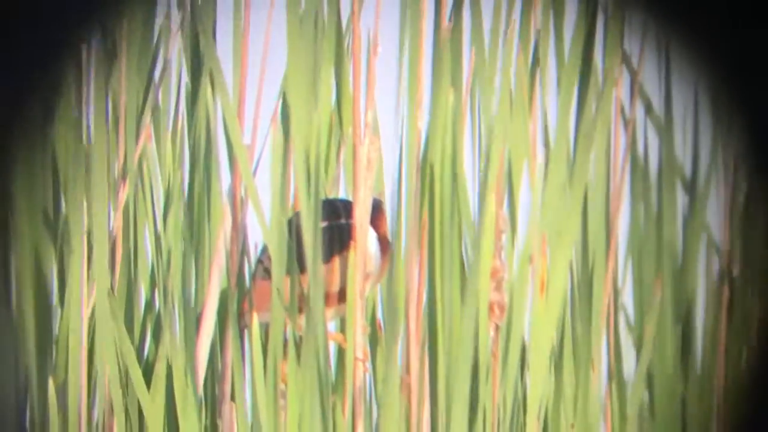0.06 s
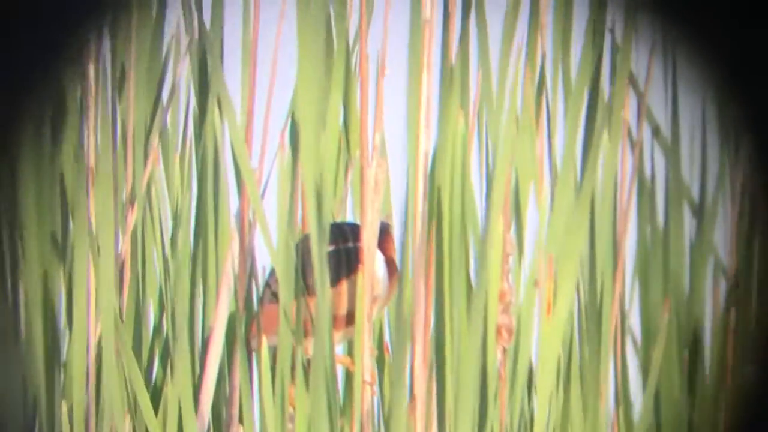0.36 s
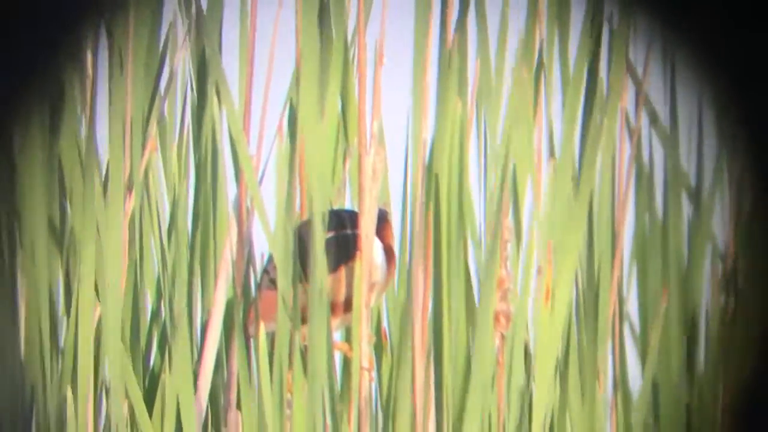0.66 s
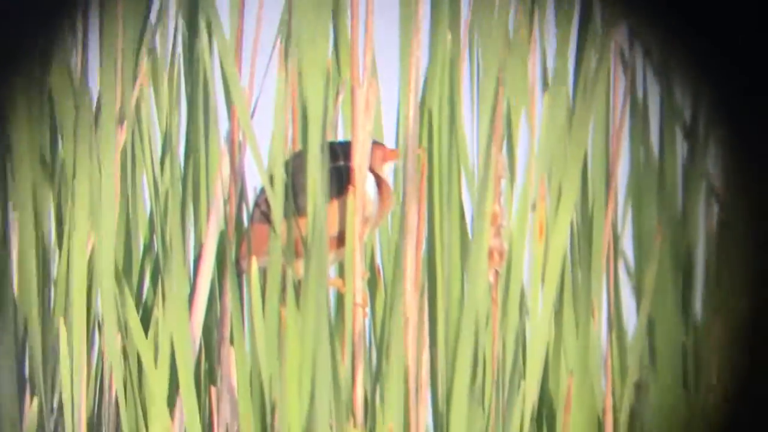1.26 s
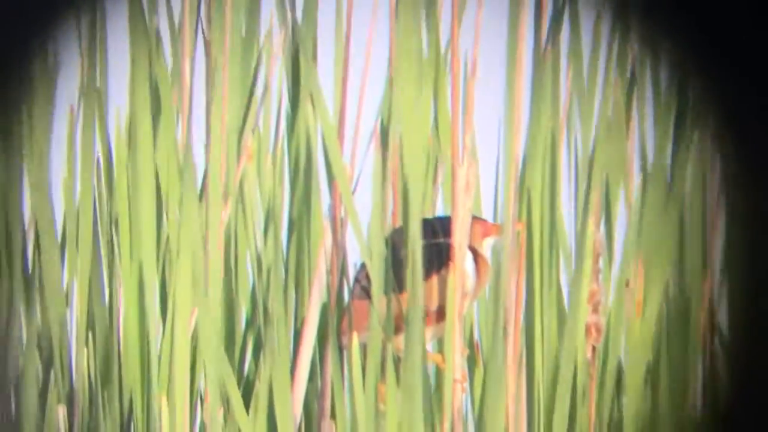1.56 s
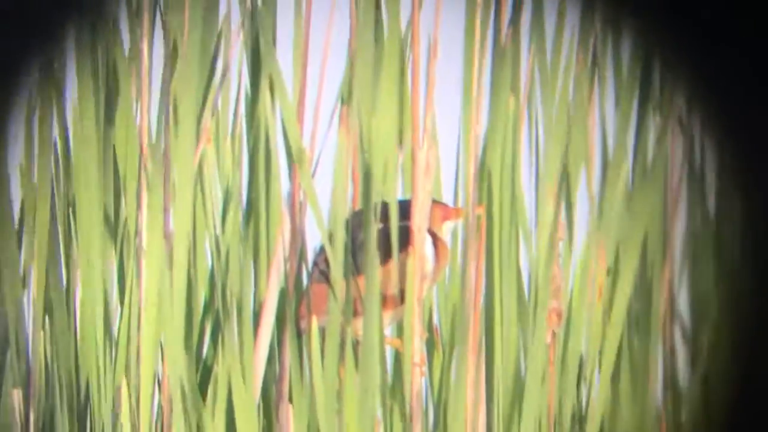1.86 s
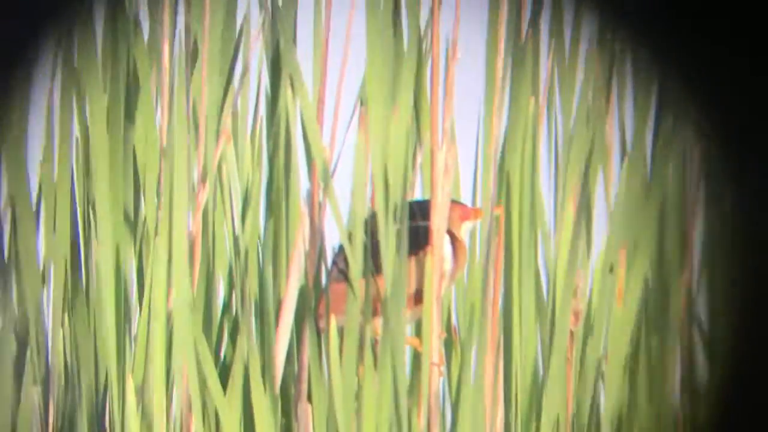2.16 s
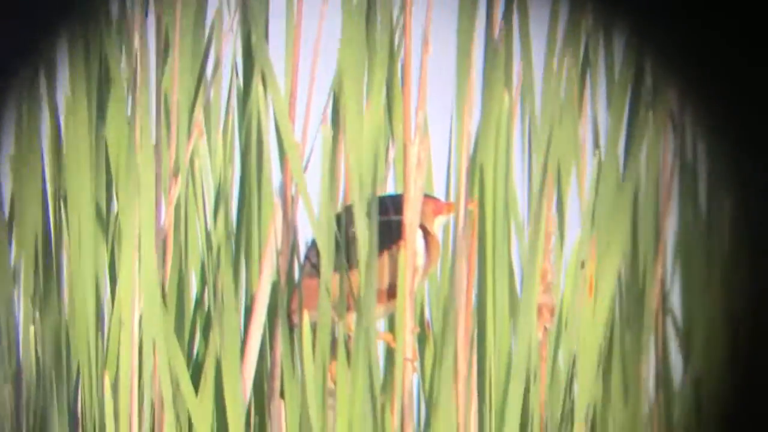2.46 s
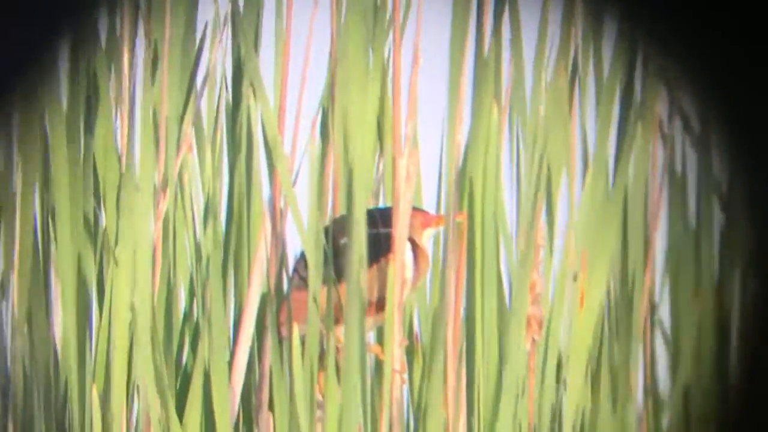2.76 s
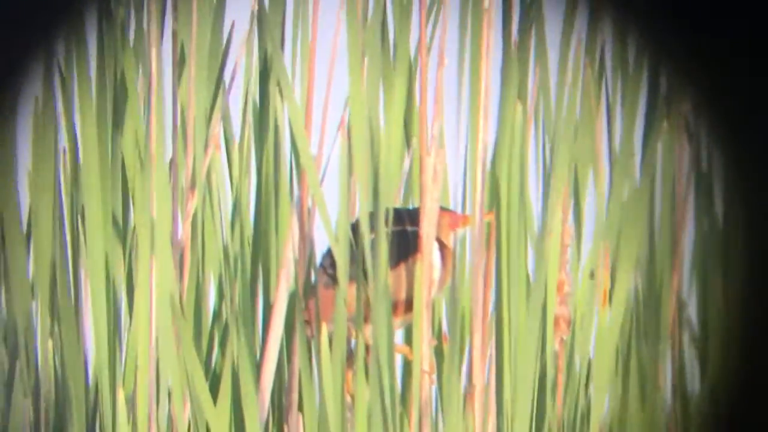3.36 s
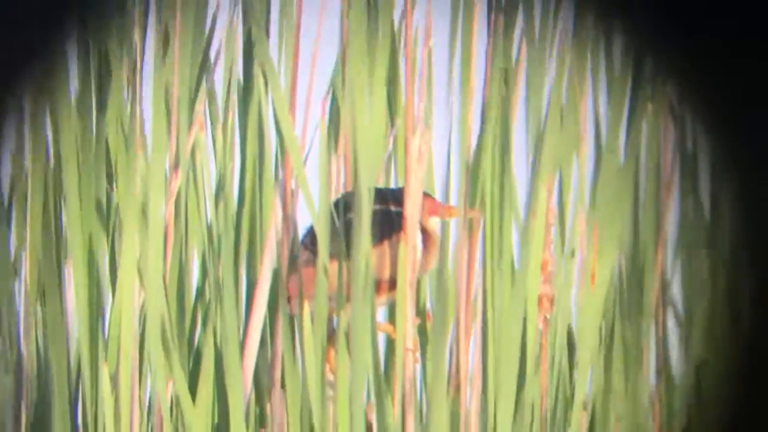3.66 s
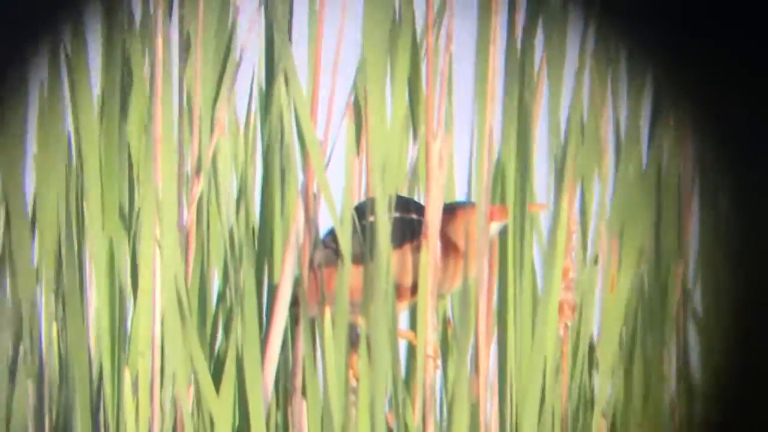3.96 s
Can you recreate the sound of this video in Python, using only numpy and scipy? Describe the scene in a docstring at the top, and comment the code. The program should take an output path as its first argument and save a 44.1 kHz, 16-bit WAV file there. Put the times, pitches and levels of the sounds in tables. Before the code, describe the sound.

A small bittern gives five short, hoarse coos in quick succession from about 0.9 to 1.5 seconds. Songbirds chirp and trill in the reeds from the start, with overlapping fast trills from 1.4 seconds and brighter slurred whistles from 2.4 until the end at 4. A far bird chorus, a low traffic-like rumble and faint hiss lie underneath, with one soft, dull bump near 2.4 seconds.

```python
"""Small bittern in a reed bed

A small bittern gives five short, hoarse coos: uneven pulses ringing one throat resonance.
Around it songbirds trill, chatter and whistle in quick, nearly pure slurs, scattered by the reeds,
over a far chorus. A low rumble, as of distant traffic, a faint hiss and one dull bump lie underneath."""
import sys
import numpy as np
from scipy import signal
from scipy.fft import rfft, irfft
from scipy.io import wavfile
from scipy.ndimage import uniform_filter1d

SR = 44100
rng = np.random.default_rng(int(sys.argv[2]) if len(sys.argv) > 2 else 0)


def store_wav(level_fs):
    """Save 16-bit WAV to argv[1]."""
    pcm = np.round(np.clip(np.atleast_2d(level_fs), -1, 1) * 32767)
    wavfile.write(sys.argv[1], SR, pcm.T.astype(np.int16))


N = 176400

RUMBLE_DB, HISS_DB = -49, -72
BUMP_S, BUMP_RISE_S, BUMP_DECAY_S, BUMP_DB = 2.395, .05, 0.054, -55.5
CHORUS_WASH_DB, FAR_CHIRP_DB = -3.5, -1.5  # relative to the chorus level
FAR_CHIRPS_PER_S, FAR_CENTRE_HZ, FAR_SPREAD_OCT = 45, 3697, .33
WAVER_HZ, SONG_ATTACK, SONG_RELEASE = 22.3, 0.27, 0.38
CHIP_SPREAD_DB, BUZZ_PER_S = 3.5, 330
WARBLE_PER_S, WARBLE_SWING_HZ, WARBLE_SAG_HZ_PER_S = 52, 294, 1300
THROAT_WIDTH_HZ, COO_BAND_HZ, COO_ATTACK, COO_RELEASE = 250, (685, 1520), 0.29, 0.33
COO_JITTER, COO_SHIMMER_DB, COO_RASP = 0.17, 12.5, 0.56  # at a hoarseness of 1
REEDS_T60_S, REEDS_ONSET_S, COO_ECHO_DB, SONG_ECHO_DB = 0.43, .012, -8.5, -11.5
CUTOFF_HZ = 15900


def from_db(db):
    """Decibels to gain."""
    return 10 ** (np.asarray(db) / 20)


def rms_one(x):
    """Scale to unit power."""
    return x / np.sqrt(np.mean(x ** 2) + 1e-20)


def add(out, start_s, x):
    """Mix a sound in at a time, trimmed to the scene."""
    i = int(start_s * SR)
    x, i = x[max(-i, 0):], max(i, 0)
    out[i:i + len(x)] += x[:max(N - i, 0)]


def span(length_s):
    """Progress 0-1 through a note."""
    return np.linspace(0, 1, max(int(length_s * SR), 16))


def swell(u, attack, release):
    """Smooth rise, hold and fall, in shares of the note."""
    rise = np.sin(np.pi / 2 * np.clip(u / attack, 0, 1)) ** 2
    fall = np.sin(np.pi / 2 * np.clip((1 - u) / release, 0, 1)) ** 2
    return rise * fall


def wander(n, rate_hz):
    """Random motion of spread about 1."""
    at = np.arange(n) * rate_hz / SR
    return np.interp(at, np.arange(4096), rng.standard_normal(4096))


def contour(u, shape):
    """Smooth path along a few points."""
    return uniform_filter1d(np.interp(u, *np.transpose(shape)), max(len(u) // 7, 1), mode="nearest")


def resonate(x, hz, width_hz):
    """One resonance of gain 1."""
    r = np.exp(-np.pi * width_hz / SR)
    poles = [1, -2 * r * np.cos(2 * np.pi * hz / SR), r * r]
    return signal.lfilter(np.array([1, 0, -1]) * (1 - r * r) / 2, poles, x)


def noise(spectrum, skirt_db=24):
    """Unit-power noise of a given colour, falling off by the octave beyond its ends."""
    hz, db = np.transpose(spectrum)
    octave, marks = np.log2(np.maximum(np.arange(N // 2 + 1) * SR / N, 1)), np.log2(hz)
    beyond = np.abs(octave - np.clip(octave, marks[0], marks[-1]))
    colour = from_db(np.interp(octave, marks, db) - skirt_db * beyond)
    return rms_one(irfft(rfft(rng.standard_normal(N)) * colour, N))


def whistle(hz, db):
    """One nearly pure bird note along a pitch path, wavering a little in pitch and level."""
    n = len(hz)
    phase = 2 * np.pi * np.cumsum(hz + WAVER_HZ * wander(n, 300)) / SR
    peak = np.sqrt(2) * from_db(db + 1.35 * wander(n, 150))
    return peak * swell(np.linspace(0, 1, n), SONG_ATTACK, SONG_RELEASE) * np.sin(phase)


def reeds(x):
    """Many weak reflections from the stems, dying away."""
    t = np.arange(SR) / SR
    tail = rng.standard_normal(SR) * from_db(-60 * t / REEDS_T60_S) * np.clip(t / REEDS_ONSET_S, 0, 1)
    return signal.fftconvolve(x, tail / np.linalg.norm(tail))[:N]


def rumble():
    """A low bed of noise with a few droning resonances, as of distant traffic."""
    # colour of the bed: (frequency [Hz], relative level [dB])
    spectrum = [(13, -50.5), (22, -23), (48, -2), (108, 1.5), (155, -5.5), (177, -10), (214, -8),
                (247, -15.5), (311, -20), (370, -24), (614, -37.5), (700, -34.5), (910, -55.5),
                (1540, -120)]
    # resonances: (frequency [Hz], width [Hz], level [dB])
    resonances = [(58.5, 8.5, -52.5), (103.9, 13.2, -52), (150, 9.2, -58), (209, 11.7, -60.5)]
    drones = sum(from_db(db) * rms_one(resonate(rng.standard_normal(N + SR), hz, width)[SR:])
                 for hz, width, db in resonances)
    drones = signal.sosfilt(signal.butter(4, 260, fs=SR, output="sos"), drones)
    return drones + from_db(RUMBLE_DB) * noise(spectrum)


def hiss():
    """Faint, steady broadband air."""
    # colour of the air: (frequency [Hz], relative level [dB])
    spectrum = [(300, 7.5), (600, 12.5), (1000, 8), (1800, 1), (5000, 4.5), (7500, -9), (9000, -3),
                (10300, -4.5), (11500, -1.5), (16000, -1)]
    return from_db(HISS_DB) * noise(spectrum)


def bump():
    """One soft, dull bump: low noise that swells and dies away."""
    # colour of the bump: (frequency [Hz], relative level [dB])
    spectrum = [(150, -20), (300, 8.5), (420, 0.5), (650, -9.5), (1000, -30), (2000, -52)]
    t = np.arange(N) / SR - BUMP_S
    envelope = np.clip(t / BUMP_RISE_S, 0, 1) * np.exp(-np.maximum(t - BUMP_RISE_S, 0) / BUMP_DECAY_S)
    return from_db(BUMP_DB) * envelope * noise(spectrum)


def far_chorus():
    """Far birds: random short slurs over the wash of their echoes."""
    # fader of the whole chorus: (time [s], level [dB])
    fader = [(0.0, -66.5), (3.69, -64.5), (4.0, -69)]
    # colour of the wash: (frequency [Hz], relative level [dB])
    spectrum = [(1800, -17), (2400, -13.5), (2900, -5), (3500, -6), (4100, 0.5), (4700, -9), (5600, -10),
                (7200, -22.5)]
    chirps = np.zeros(N)
    for when, pitch, slope, length, loud in rng.random((int(FAR_CHIRPS_PER_S * N / SR), 5)):
        u = span(0.01497 + 0.0401 * length)
        octave = FAR_SPREAD_OCT * np.log(pitch / (1 - pitch)) / 2  # pitches cluster at the centre
        glide = .6 * (slope - .65) * (u - .5)
        hz = FAR_CENTRE_HZ * 2 ** (np.clip(octave, -1, 1) + glide)
        add(chirps, when * N / SR, whistle(hz, db=8 * loud - 16 * abs(octave)))
    scattered = from_db(FAR_CHIRP_DB) * rms_one(chirps + reeds(chirps))
    wash = from_db(CHORUS_WASH_DB + 1.4 * wander(N, 50)) * noise(spectrum)
    return from_db(np.interp(np.arange(N) / SR, *np.transpose(fader))) * (scattered + wash)


def trills():
    """Each bird repeats one swept or buzzy chip at a steady pace."""
    # runs: (start [s], period [s], chip length [s], from [Hz], to [Hz], level [dB], buzz depth [Hz])
    runs = [(.194, .0991, .015, 7270, 5500, -71, 30), (0.041, .0996, 0.021, 4400, 4350, -63, 330),
            (1.415, .0816, .024, 5950, 4200, -64.5, 110), (1.39, .1185, .016, 5100, 7760, -70, 80),
            (1.785, .0808, .016, 5450, 5700, -63, 260), (1.39, .0808, 0.023, 8950, 9050, -79, 610),
            (1.525, .081, 0.0299, 4400, 3600, -62, 480)]
    # length of each run: (chips [count])
    counts = [9, 10, 23, 6, 8, 13, 11]
    out = np.zeros(N)
    for (first, period, length, start_hz, end_hz, db, buzz_hz), count in zip(runs, counts):
        u = span(length)
        sweep = start_hz + (end_hz - start_hz) * u
        for k in range(count):
            buzz_cycles = BUZZ_PER_S * length * u * rng.uniform(0.803, 1.203) + rng.random()
            buzz = buzz_hz * np.sin(2 * np.pi * buzz_cycles)
            add(out, first + k * period, whistle(sweep + buzz, db + CHIP_SPREAD_DB * rng.normal()))
    return out


def songbirds():
    """Single whistles, each kind with its own pitch gesture."""
    # whistles that hook over and fall: (time [s], length [s], top pitch [Hz], level [dB])
    hooks = [(.462, 0.055, 4210, -60), (.577, 0.05, 4150, -62.5), (1.99, .045, 4150, -61),
             (2.103, 0.047, 4160, -59.5), (2.328, .042, 3990, -66), (2.437, 0.046, 4290, -56.5),
             (2.535, 0.036, 4090, -63), (2.597, .066, 4396, -57), (3.057, 0.053, 4275, -57),
             (3.223, .068, 4450, -55.5), (3.626, .052, 4050, -59), (3.675, .058, 4250, -60.5),
             (3.733, 0.05, 4100, -59.5), (3.836, 0.072, 4390, -62)]
    # whistles that rise, dip and rise again: (time [s], length [s], first crest [Hz], level [dB])
    swoops = [(2.768, .103, 5190, -55.5), (3.394, .103, 5150, -58)]
    # thin high falls: (time [s], length [s], top pitch [Hz], level [dB])
    falls = [(1.143, .03, 6330, -75), (2.5, 0.033, 6700, -71), (2.699, 0.033, 6800, -71),
             (2.9, .032, 6700, -69), (3.099, .034, 6700, -73), (3.298, 0.036, 6700, -70),
             (3.508, .034, 6960, -76), (3.672, .036, 7100, -75), (3.806, .034, 7000, -74),
             (3.949, .034, 7000, -74.5)]
    # their pitch curves: (share of the note [0-1], pitch [ratio])
    hook_shape = [(0, .92), (.25, 1), (.5, 0.93), (.75, .82), (1, .72)]
    swoop_shape = [(0, .645), (.18, .69), (0.331, .8), (0.471, 1), (0.581, 0.78), (.68, .78), (.84, .93),
                   (1, 1.1)]
    fall_shape = [(0, 1), (.5, .88), (1, .73)]
    # plain slurs, near and far: (time [s], length [s], start [Hz], middle [Hz], end [Hz], level [dB])
    slurs = [(-.01, 0.082, 2950, 2930, 2910, -68), (0.028, .09, 4050, 4450, 5950, -71),
             (0.179, .1, 3900, 4430, 6000, -68.5), (0.244, .045, 3650, 3210, 3050, -65.5),
             (.345, .045, 5000, 5430, 5600, -72), (.378, .032, 5700, 4600, 3950, -60),
             (.38, .11, 3300, 3330, 3300, -66.5), (0.867, .03, 3250, 3330, 3300, -67),
             (1.009, 0.11, 3350, 3100, 3450, -76), (1.13, .05, 3500, 3400, 3203, -73),
             (1.255, .085, 3300, 3480, 3500, -69), (1.285, 0.054, 6950, 6700, 5600, -72.5),
             (1.445, 0.088, 2850, 2940, 3220, -67.5), (1.682, .11, 2700, 2630, 2700, -76.5),
             (1.768, .045, 3100, 3130, 3150, -62), (1.868, .055, 5450, 5370, 4160, -63.5),
             (2.5, 0.039, 4350, 4700, 5400, -63.5), (2.954, .045, 6300, 5490, 5200, -73),
             (3.118, .05, 3900, 4630, 5300, -61.5), (3.52, 0.047, 5400, 5300, 3800, -67),
             (3.57, .045, 6000, 5550, 5200, -72), (3.745, .05, 4100, 4780, 5250, -69),
             (3.882, 0.13, 2750, 2130, 2080, -69)]
    # fast warbles: (time [s], length [s], pitch [Hz], level [dB])
    warbles = [(2.776, .17, 3004, -64), (3.444, .175, 2960, -66)]
    out = np.zeros(N)
    for notes, shape in ((hooks, hook_shape), (swoops, swoop_shape), (falls, fall_shape)):
        for start, length, hz, db in notes:
            add(out, start, whistle(hz * contour(span(length), shape), db))
    for start, length, start_hz, middle_hz, end_hz, db in slurs:
        parabola = np.polyfit([0, .5, 1], [start_hz, middle_hz, end_hz], 2)
        add(out, start, whistle(np.polyval(parabola, span(length)), db))
    for start, length, hz, db in warbles:
        t = span(length) * length
        swing = np.cos(2 * np.pi * WARBLE_PER_S * t)
        sag = WARBLE_SAG_HZ_PER_S * (t - length / 2)
        add(out, start, whistle(hz + WARBLE_SWING_HZ * swing - sag, db - 3 * swing))
    return out


def bittern():
    """Uneven pulses with an arching pitch ring one throat resonance; each coo starts hoarse and clears."""
    # coos: (time [s], length [s], pitch [Hz], throat resonance [Hz], level [dB], roughness [0-1])
    coos = [(0.878, 0.057, 384.7, 1080, -60, 0.51), (1.021, .054, 361, 1030, -58, 0.33),
            (1.165, 0.061, 338, 970, -56, .35), (1.298, 0.063, 377, 1040, -54, 0.28),
            (1.436, 0.049, 334.2, 1040, -59.5, 0.82)]
    # pitch curve of a coo: (share of the note [0-1], pitch [ratio])
    arch = [(0, .86), (.35, 1), (.65, .98), (1, 0.89)]
    out = np.zeros(N)
    band = signal.butter(3, COO_BAND_HZ, "band", fs=SR, output="sos")
    for start, length, hz, throat_hz, db, roughness in coos:
        u = span(length)
        n, hoarseness = len(u), roughness * (1.5 - u)
        jitter = 1 + COO_JITTER * hoarseness * wander(n, hz)
        cycles = np.cumsum(hz * contour(u, arch) * jitter) / SR
        shimmer = from_db(COO_SHIMMER_DB * hoarseness * wander(n, hz))
        pulses = np.diff(np.floor(cycles), prepend=0) * shimmer  # one pulse a cycle
        rasp = COO_RASP * hoarseness * rng.standard_normal(SR)[:n] * (1 + np.cos(2 * np.pi * cycles))
        voice = signal.sosfilt(band, resonate(rms_one(pulses) + rasp, throat_hz, THROAT_WIDTH_HZ))
        add(out, start, from_db(db) * rms_one(voice) * swell(u, COO_ATTACK, COO_RELEASE))
    return out


def scene():
    """Mono mix of the near birds, their scatter in the reeds and the background."""
    coos, song = bittern(), songbirds() + trills()
    scatter = reeds(from_db(COO_ECHO_DB) * coos + from_db(SONG_ECHO_DB) * song)
    return (coos + song + scatter + far_chorus() + rumble() + hiss() + bump())[None]


def record(dry):
    """A steep low-pass trims the very top."""
    return signal.sosfilt(signal.ellip(10, .1, 70, CUTOFF_HZ, fs=SR, output="sos"), dry)


dry = scene()
out = record(dry)
store_wav(out)
```